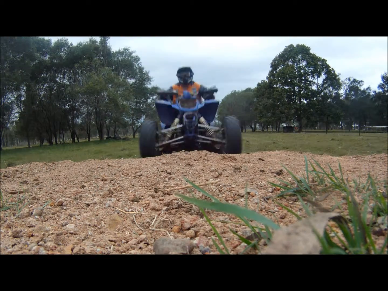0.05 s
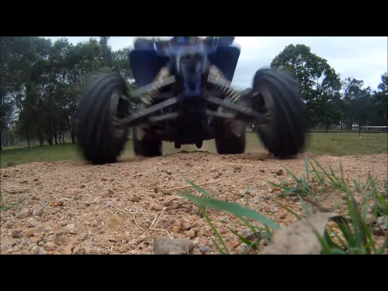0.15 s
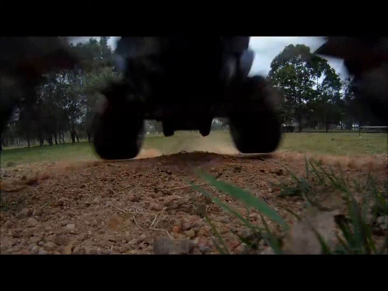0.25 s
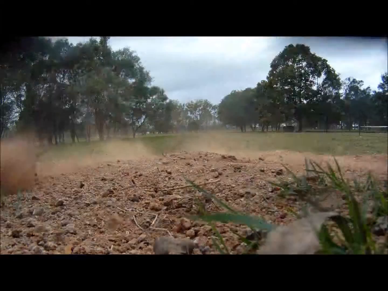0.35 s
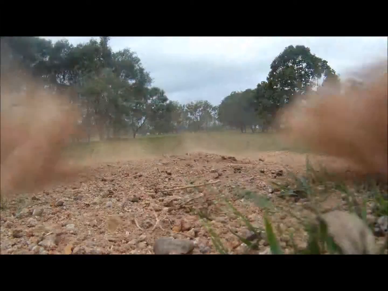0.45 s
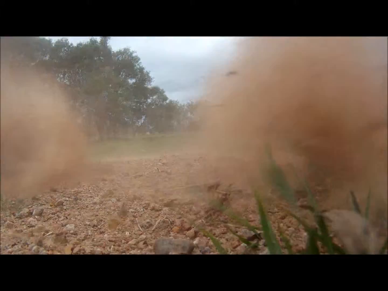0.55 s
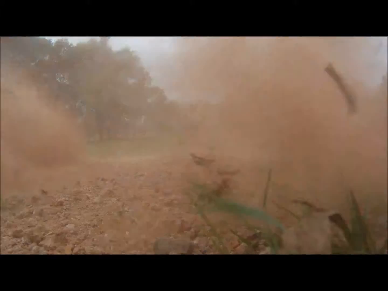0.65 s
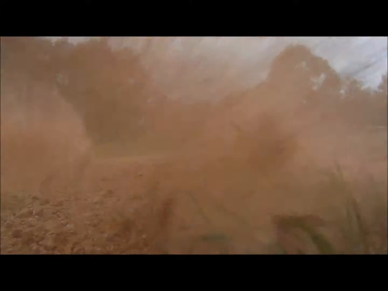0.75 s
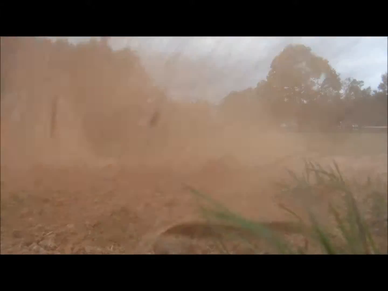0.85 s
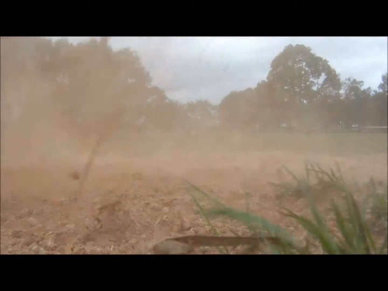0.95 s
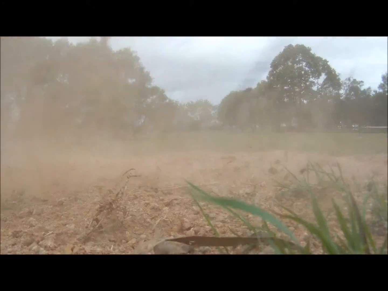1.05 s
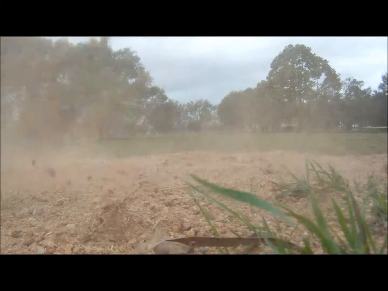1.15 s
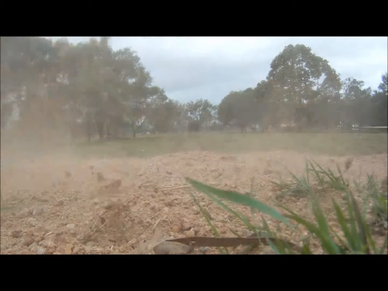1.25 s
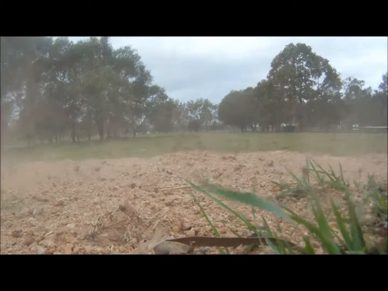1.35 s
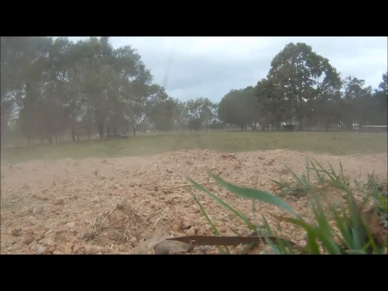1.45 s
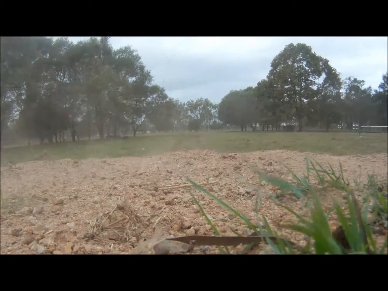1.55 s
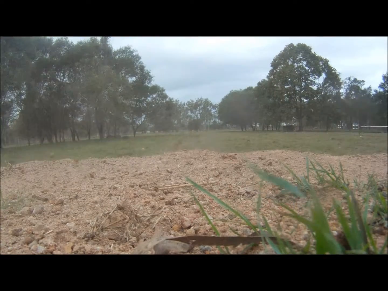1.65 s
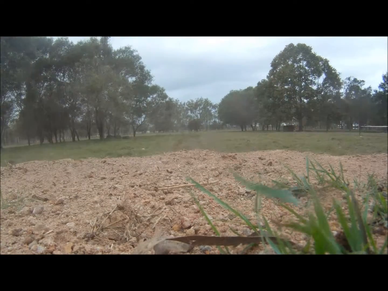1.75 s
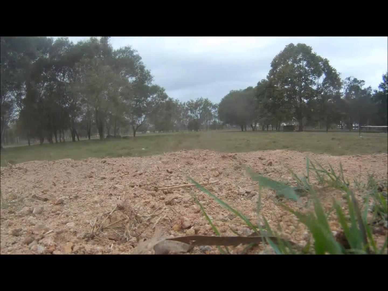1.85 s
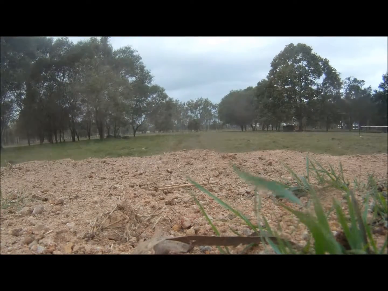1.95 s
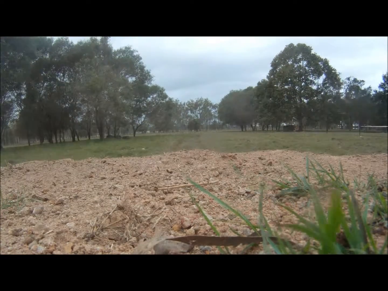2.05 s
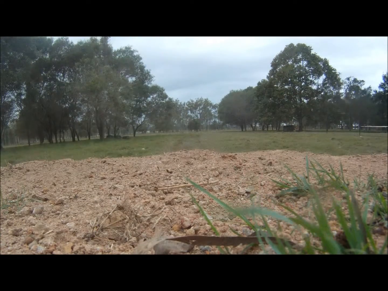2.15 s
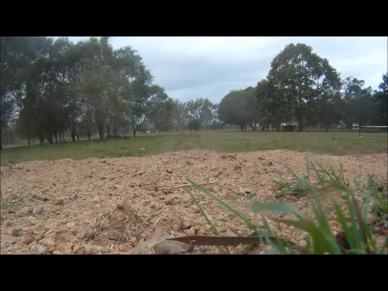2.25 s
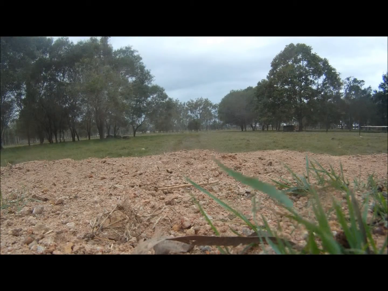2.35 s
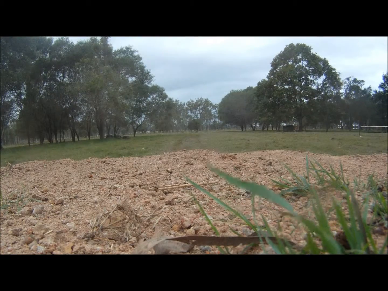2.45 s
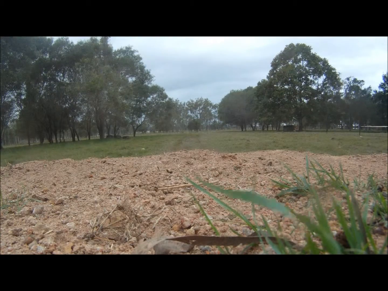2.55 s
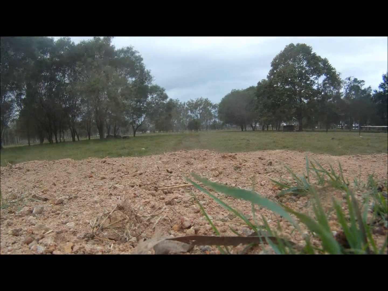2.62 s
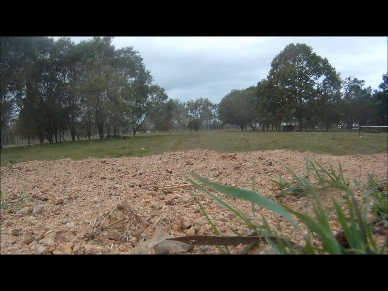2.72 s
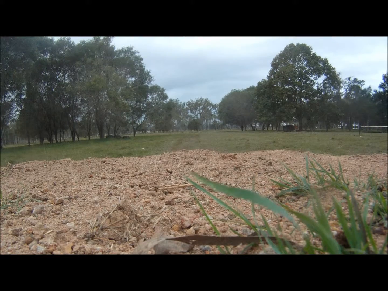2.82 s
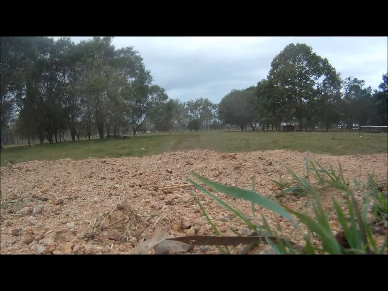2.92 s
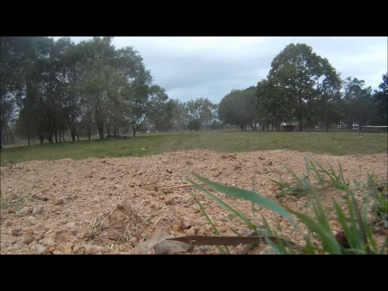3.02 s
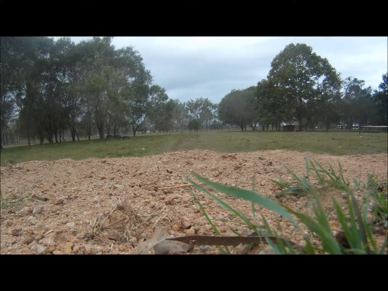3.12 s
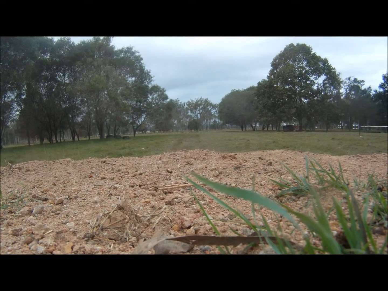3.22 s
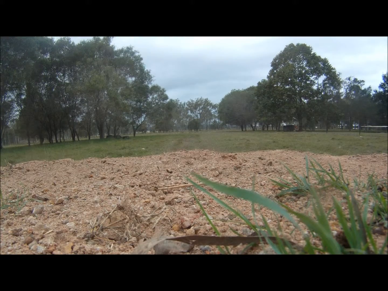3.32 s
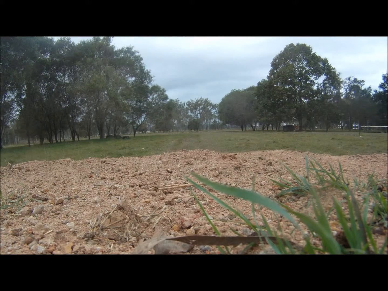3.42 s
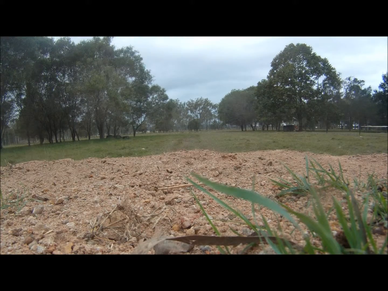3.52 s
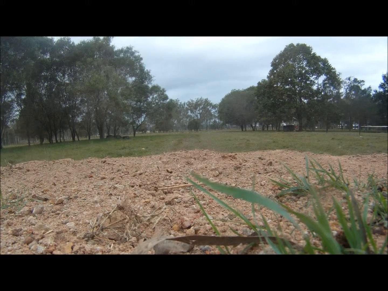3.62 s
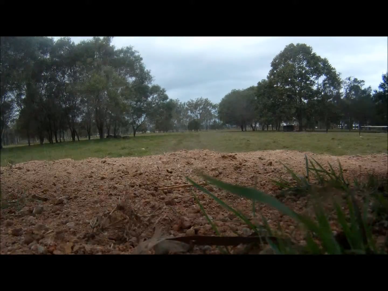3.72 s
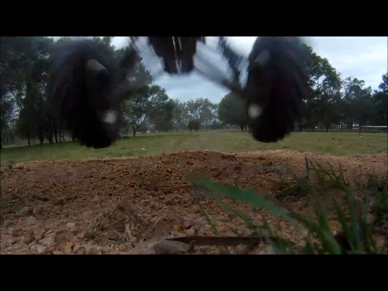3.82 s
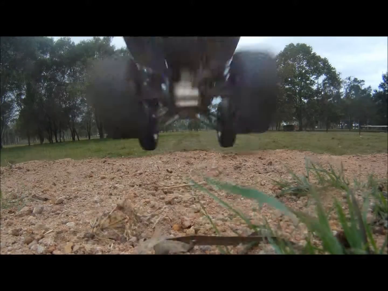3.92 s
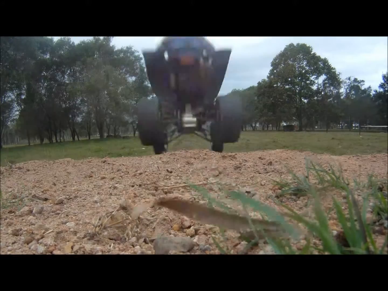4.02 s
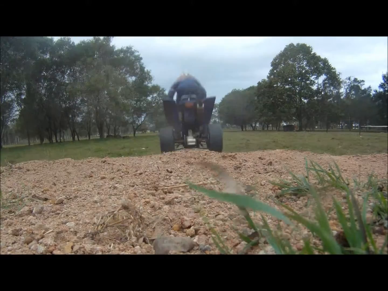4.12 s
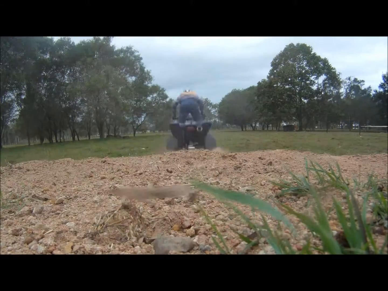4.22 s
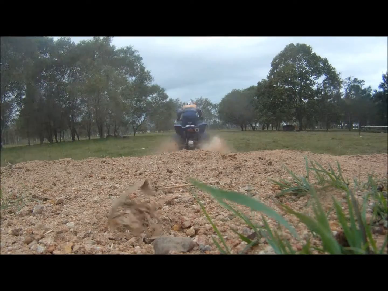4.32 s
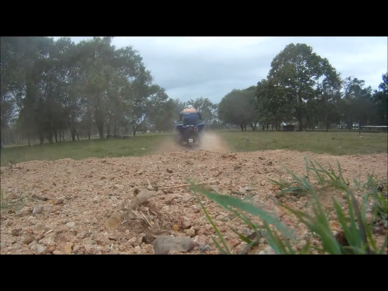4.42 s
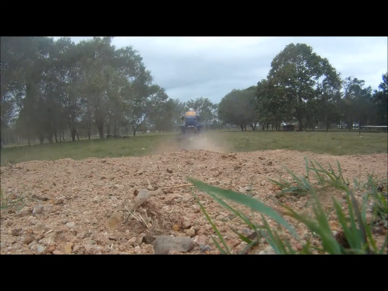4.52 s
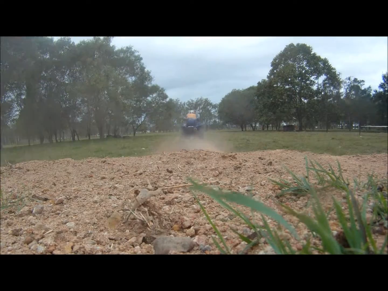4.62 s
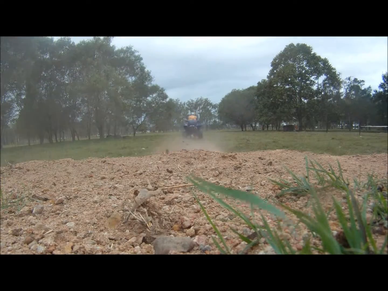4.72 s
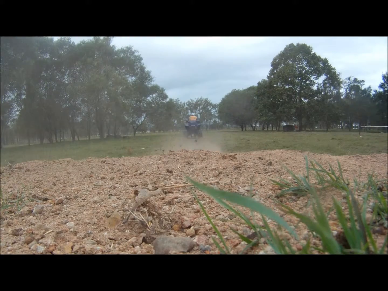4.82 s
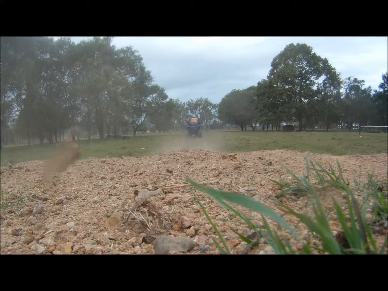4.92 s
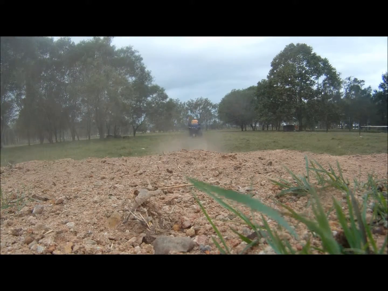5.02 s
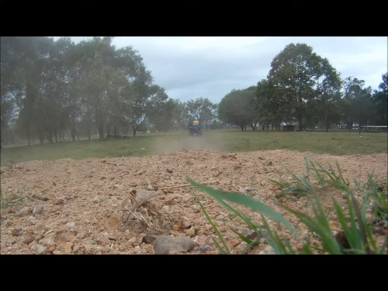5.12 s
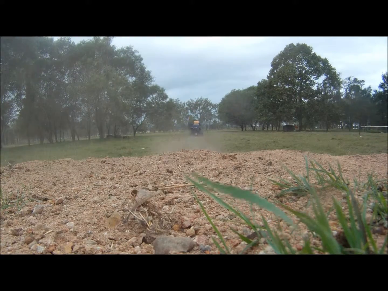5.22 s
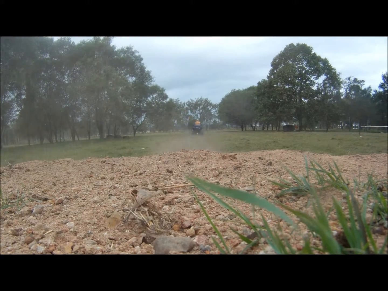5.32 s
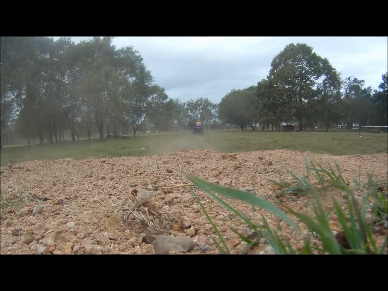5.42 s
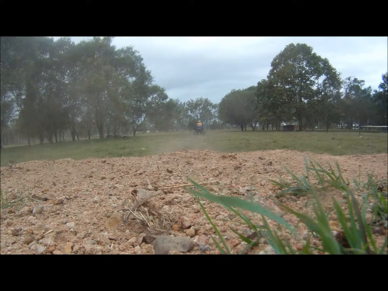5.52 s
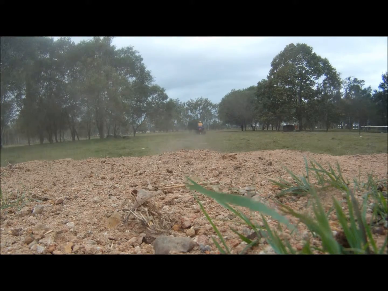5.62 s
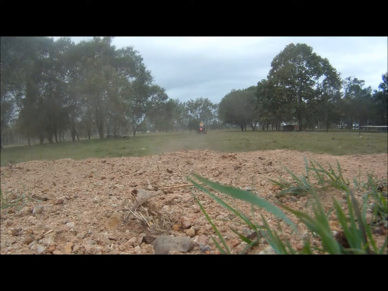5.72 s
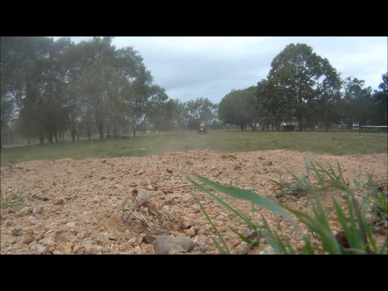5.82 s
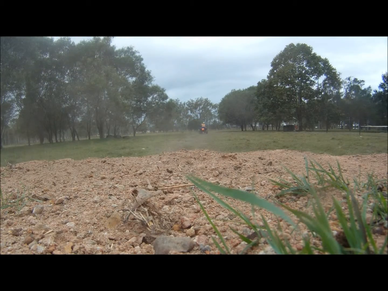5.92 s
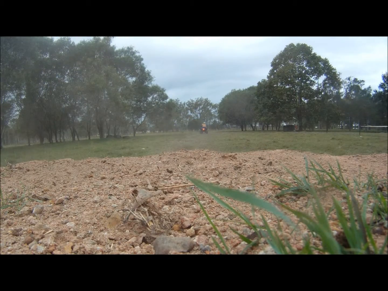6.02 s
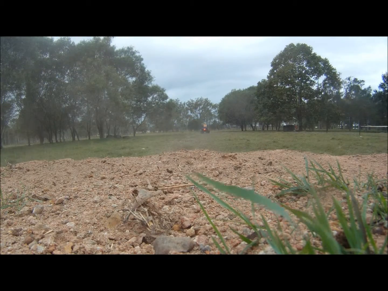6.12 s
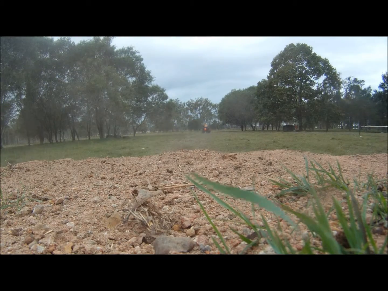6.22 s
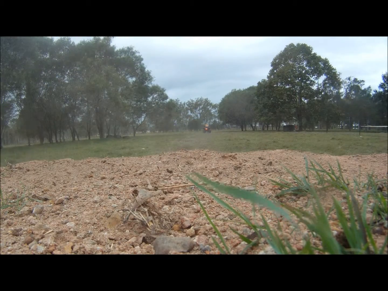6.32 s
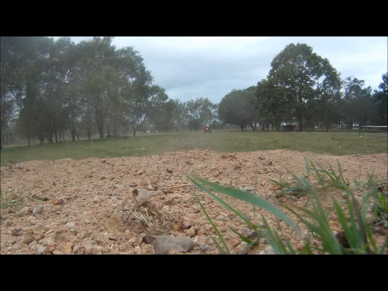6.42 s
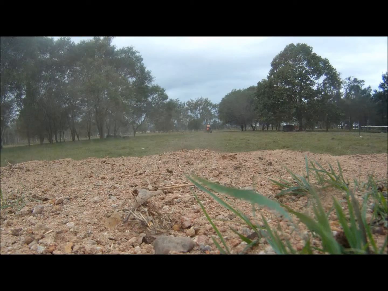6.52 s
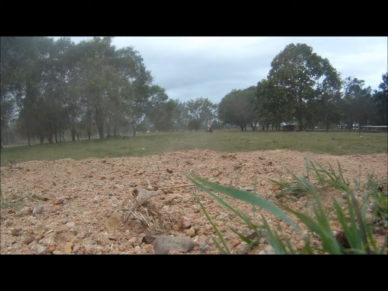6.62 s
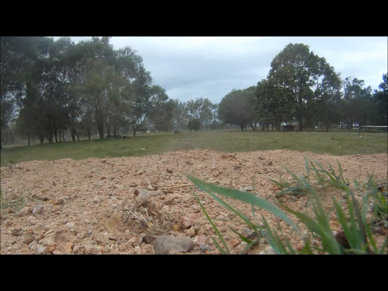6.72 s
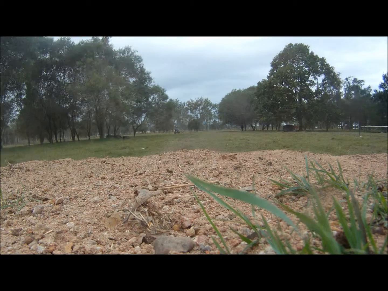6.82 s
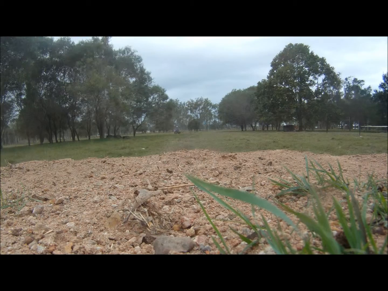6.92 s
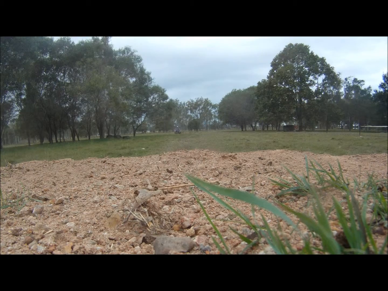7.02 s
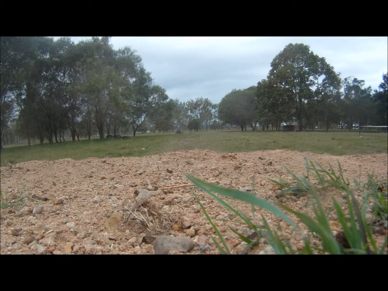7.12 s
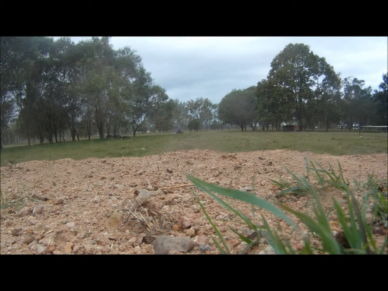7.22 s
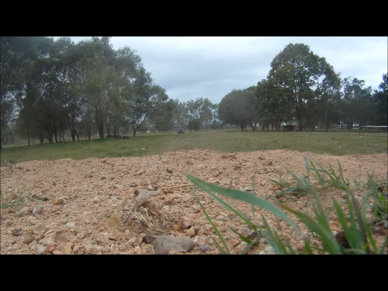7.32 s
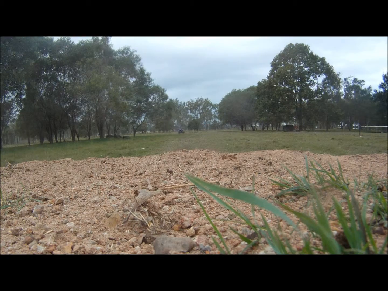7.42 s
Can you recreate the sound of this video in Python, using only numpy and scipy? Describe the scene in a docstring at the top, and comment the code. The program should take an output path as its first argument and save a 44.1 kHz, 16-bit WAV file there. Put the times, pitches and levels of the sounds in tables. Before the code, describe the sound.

A single-cylinder quad bike blares close over a microphone in a hard case on the ground. Dirt sprays and stones crack against the case, loud enough to distort and briefly duck the engine. The bike rolls off behind, returns revving, jumps overhead again with grit and clanking suspension, then putters away across an open, faintly breezy field.

```python
"""A single-cylinder quad bike jumps a dirt mound right over a camera on the ground, throwing up dirt.
As it comes down, stones crack on the case as modal rings with noise; loud peaks clip and the gain ducks.
The bike rolls on, comes back from behind, jumps the mound again and clanks over bumps on its way out.
A late pebble rattles on the case; the bike putters away over a faintly breezy field, missing a few firings.
The engine is firing orders shaped by the pipe, plus ringing and noise bursts once per firing."""
import sys
import numpy as np
from scipy import signal
from scipy.fft import rfft, irfft, next_fast_len
from scipy.io import wavfile
from scipy.ndimage import uniform_filter1d, minimum_filter1d, map_coordinates

SR = 44100
rng = np.random.default_rng(int(sys.argv[2]) if len(sys.argv) > 2 else 0)


def to_wav(s):
    """Save 16-bit WAV."""
    ch = np.atleast_2d(s).T  # columns
    pcm = np.round(np.clip(ch, -1, 1) * 32767)  # PCM
    wavfile.write(sys.argv[1], SR, pcm.astype(np.int16))


N = 328986
T = np.arange(N) / SR  # s


def amp(db):
    """Amplitude factor of a level in dB."""
    return 10 ** (np.asarray(db) / 20)


def unit(x):
    """x scaled to rms 1."""
    return x / np.sqrt(np.mean(x ** 2) + 1e-20)


def along(points, hz):
    """Interpolate (hz, value) points on a log frequency axis."""
    point_hz, values = np.transpose(points)
    return np.interp(np.log(hz + 1), np.log(point_hz + 1), values)


def curves(rows):
    """One value per sample for each column after the time."""
    time_s, *columns = np.transpose(rows)
    return [np.interp(T, time_s, column) for column in columns]


def wobble(rate_hz):
    """Smooth random curve with rate_hz knots a second."""
    knots = rng.standard_normal(int(N * rate_hz / SR) + 4)
    coarse_s = T[::16]
    return np.interp(T, coarse_s, map_coordinates(knots, [coarse_s * rate_hz]))


def filtered(x, response):
    """x times a response of frequency."""
    m = next_fast_len(N + 8192)
    return irfft(rfft(x, m) * response(np.fft.rfftfreq(m, 1 / SR)), m)[..., :N]


def causal(points, size=8192):
    """Frequencies and minimum-phase response of a spectrum, by folding its cepstrum."""
    hz = np.fft.rfftfreq(size, 1 / SR)
    cepstrum = irfft(np.log(amp(along(points, hz))))
    folded = 2 * cepstrum * (np.arange(size) < size // 2)
    return hz, np.exp(rfft(folded) - cepstrum[0])


def in_case(x, spectrum):
    """x with the given colour and the resonances of the camera case, rms 1."""
    # resonances and hollows of the case: centre_hz, width_hz, gain_db
    case_modes = [(1000, 110, 1.5), (1420, 100, 4), (2140, 220, 2.5), (3200, 73, 4.5), (5950, 650, -11.5),
                  (8800, 200, 9), (9810, 450, 9), (11840, 4500, -5), (14200, 390, 11.5), (15100, 280, 7.5)]

    def response(f):
        peaks_db = sum(db / (1 + (2 * (f - hz) / width_hz) ** 2) for hz, width_hz, db in case_modes)
        return amp(along(spectrum, f) + peaks_db)

    return unit(filtered(x, response))


def air():
    """A faint breeze over grass and trees: slowly wavering coloured noise."""
    # open-air noise colour: hz, relative_db_per_hz
    field_colour = [(25, 0.5), (120, 3), (300, -1), (600, -10.5), (1600, -13.5), (2200, -12.5),
                    (4000, -16.5), (6000, -21), (7500, -22), (9800, -25), (12000, -31), (15000, -26)]
    level_db = -61.5 + .7 * wobble(2)
    return amp(level_db) * in_case(rng.standard_normal(N), field_colour)


def grit(density_hz, spread_db, clump_db):
    """Dirt patters down as random grains in clumps; each spray swells fast and dies away."""
    # grain colour: hz, relative_db_per_hz
    grain_colour = [(350, -47.5), (600, -16.5), (788, -12), (1390, -8), (2400, -3), (3070, -6),
                    (6060, -17.5), (9630, -13.5), (12000, -40.5), (14300, -14.5), (15500, -32)]
    # dirt sprays at the jumps and late trickles of grit: peak_s, peak_level_db, t60_s
    sprays = [(0.209, -20, .45), (.54, -30, 0.44), (.645, -14.5, .25), (.745, -20, 0.47), (.88, -34, 1.2),
              (1.17, -40.5, 1.4), (3.689, -17.5, .3), (4.27, -49.5, 1.2)]
    rise_db_per_s = 219
    sizes = amp(spread_db * rng.standard_normal(N) + clump_db * wobble(70))
    grains = (rng.random(N) < density_hz / SR) * rng.standard_normal(N) * sizes
    impulse = irfft(causal(grain_colour)[1])
    flow = 0
    for s, db, t60_s in sprays:
        drop_db = np.maximum(rise_db_per_s * (s - T), 60 * (T - s) / t60_s)
        flow = flow + amp(db - drop_db)
    return flow * unit(signal.fftconvolve(grains, impulse)[:N])


def chassis():
    """Chain and suspension clank over bumps: short decaying bursts of coloured noise."""
    # clanks: start_s, relative_level_db, t60_s
    knocks = [(4.2745, -23, 0.035), (4.2987, -21.5, 0.02), (4.3406, -33, 0.037), (4.466, -16, 0.017),
              (4.744, -27, 0.038), (4.94, -17.5, 0.13), (4.9782, -10, 0.014)]
    colour = [(300, -12), (900, -2.5), (2500, -3.0), (4500, -13.5), (9000, -18), (15000, -22)]
    blows = sum(amp(db - 60 * np.maximum(T - s, 0) / t60_s) * (T >= s) for s, db, t60_s in knocks)
    return amp(-12.5) * blows * in_case(rng.standard_normal(N), colour)


def strike(t, t60_s, pitch, crack):
    """Struck case: its modes at new strengths and pitches plus a crack of noise, peak 1."""
    # modes of the struck case: nominal_hz, nominal_db
    shell_modes = [(780, -14), (1050, -7.5), (1420, -12), (1880, 1), (2200, 0), (2460, 2.5), (2700, 2.5),
                   (3150, -9), (3650, -1.5), (4590, -8), (8250, -14.5), (9300, -4.5), (9850, -21.5),
                   (14400, -21)]
    hz, db = np.transpose(shell_modes)[:, :, None]
    strength, detune, phase = rng.standard_normal((3, len(hz), 1))
    mode_hz = hz * pitch * (1 + .03 * detune)
    ring = np.sum(amp(db + 2 * strength) * np.sin(2 * np.pi * (mode_hz * t + phase)), axis=0)
    colour = amp(along(shell_modes, np.fft.rfftfreq(len(t), 1 / SR)))
    snap = unit(irfft(rfft(rng.standard_normal(len(t))) * colour, len(t)))
    envelope = amp(-60 * t / t60_s) * (1 - np.exp(-t / 0.00017))
    blow = (unit(ring) + crack * snap) * envelope
    return blow / np.max(abs(blow))


def stones(thud_time_s):
    """Stones crack on the case; heavy blows come with a short low-mid ring and one slow swing of pressure."""
    # blows on the case: start_s, crack_peak_db, thud_gain_db, pitch_factor
    blows = [(0.506, -2, -48, 1), (.52, -1, -40, 1.19), (.558, -8, -42, 0.98), (.581, -3, -43, 1.36),
             (.602, -3, -42, 1), (.608, -6, -33, 1.04), (0.629, -6, -36, 1), (.642, 4, -44.5, 1.05),
             (.646, 3, -26.5, 0.95), (.66, 6.5, -34, 1.05), (0.673, -2, -41.5, 0.92),
             (0.72, -4, -38.5, 0.89), (.733, -9, -38, 1.05), (.754, 7.5, -5, 1), (0.778, -.5, -43, .9),
             (.804, -5.5, -44, 1), (.822, 11.5, -15.5, .85), (.868, -10.5, -51, 0.83),
             (.876, -7, -43, 1.08), (.906, -12.5, -55, 0.92), (0.9525, -3.5, -46, 1.03),
             (.96, -3.5, -38.5, 0.96), (.971, -19, -43, 1), (1.0112, 9, -18, 0.88), (1.039, 9, -21.5, 1),
             (1.046, 11.5, -29, 0.96), (1.13, -20.5, -51, 1.14), (1.154, -17.5, -57, 0.82),
             (1.2074, 19, 7.5, 0.82), (1.362, -17.5, -50, 1.17), (5.346, 4.5, -28.5, 0.9),
             (5.3557, 5, -23, 0.88), (5.364, 11.5, -30, 0.98)]
    # short low-mid ring that comes with a heavy blow: mode_hz, relative_db, t60_s
    knock_modes = [(271.7, -6.5, 0.011), (349.6, -5.5, 0.033), (578, -5, 0.042)]
    out, t = np.zeros(N + SR), np.arange(SR // 10) / SR
    u = t / thud_time_s
    swing = -4 * u * (1 - u / 2) * np.exp(-u)
    knock = sum(amp(db - 60 * t / t60_s) * np.sin(2 * np.pi * hz * t) for hz, db, t60_s in knock_modes)
    thud = swing + amp(-0.5) * knock
    for s, db, thud_db, pitch in blows:
        crack = amp(db) * strike(t, t60_s=0.015, pitch=pitch, crack=.85)
        out[round(s * SR):][:len(t)] += crack + amp(thud_db) * thud
    return out[:N]


def heard():
    """Distance to the bike in metres, and how far it is in front of the camera (0-1)."""
    # path of the bike, negative behind the camera: time_s, in_front_m
    track = [(0, 4), (.27, 0), (.6, -1.55), (.8, -3), (2.1, -4.5), (2.65, -10), (3.05, -8.5), (3.35, -4.5),
             (3.72, 0), (3.85, 1.17), (4.08, 2), (4.22, 3), (4.9, 4.5), (6, 10.5), (6.7, 16), (7.46, 20.5)]
    pass_height_m, side_blend_m = 1, .6
    x_m, = curves(track)
    return np.hypot(x_m, pass_height_m), (1 + np.tanh(x_m / side_blend_m)) / 2


def rasp_swell():
    """Extra gain of the rasp during its louder spells around the two passes."""
    # spells of brighter, louder rasp: start_s, end_s
    spells = [(.16, 0.41), (3.62, 4.13)]
    gain_db, fade_s = 7, .04

    def edge(s):
        return np.tanh((T - s) / fade_s) / 2

    return amp(gain_db * sum(edge(start_s) - edge(end_s) for start_s, end_s in spells))


def pipe_towards_camera(distance_m, turn_time_s):
    """1 while the bike drives away, its pipe pointing at the camera, else 0; smoothed over turn_time_s."""
    return uniform_filter1d(1. * (np.gradient(distance_m) > 0), size=round(turn_time_s * SR))


def loudness(rate_hz, throttle, distance_m, front):
    """Gain of each engine voice from distance, gas, engine speed and side of the camera."""
    # each voice: level_db (1 m behind, full throttle, cruise rate), loss_db_per_distance_doubling,
    # gain_db_per_gas_doubling, gain_db_per_speed_doubling, gain_db_in_front
    voices = dict(
        thump=(-27, 8.5, 0.48, -5.5, 4),
        hum=(-24, 9, 3.5, 6, 4.5),
        bark=(-24.5, 9.5, 5, 6.5, 4),
        rumble=(-41.5, 8.5, 1.5, 0, 6.5),
        chuff=(-27, 9, 4.5, 4.5, -1.5),
        crack=(-30, 7, 6, -0.5, -13),
        rasp=(-21, 11.5, 0.93, 4, 0.47))
    idle_feed, cruise_rate_hz = 0.027, 48.2  # idle_feed: gas past a shut throttle
    gas_share = (throttle + idle_feed) / (1 + idle_feed)
    far, gas, revs = np.log2([distance_m, gas_share, rate_hz / cruise_rate_hz])
    return {name: amp(db - far_db * far + gas_db * gas + revs_db * revs + front_db * front)
            for name, (db, far_db, gas_db, revs_db, front_db) in voices.items()}


def crank(jitter):
    """Firing rate, cycles run so far, and a gate that drops on missed firings."""
    # engine speed: time_s, firings_hz
    firing_rate = [(0, 39.9), (.12, 39.9), (.28, 56.4), (.36, 56.1), (.45, 60.6), (.53, 56.7), (.62, 61.4),
                   (.9, 49), (1.1, 45.5), (1.6, 45.4), (1.73, 49.6), (1.92, 48), (2.03, 53.8), (2.25, 43),
                   (2.4, 39), (3.15, 38.6), (3.3, 41.2), (3.52, 47.7), (3.7, 59.4), (3.8, 66.1), (4, 67.8),
                   (4.13, 74.1), (4.2, 64.6), (4.3, 56), (4.45, 50.2), (4.78, 45), (4.92, 53.5),
                   (5.05, 37.8), (5.25, 39.2), (5.9, 36), (6.7, 30.7), (6.78, 39), (7.1, 46.4),
                   (7.46, 50.6)]
    # cycles that fail to fire: time_s
    misfires = [5.903, 6.625, 6.757]
    rate_hz, = curves(firing_rate)
    cycles = np.cumsum(rate_hz * (1 + jitter * wobble(45))) / SR
    fired = np.ones(N)
    for s in misfires:
        missed = np.round(np.interp(s, T, cycles))
        fired[np.floor(cycles + .15) == missed] = 0.19
    return rate_hz, cycles, uniform_filter1d(fired, size=100)


def strengths(cycles, scatter_db):
    """Every combustion has its own strength."""
    sizes = amp(scatter_db * rng.standard_normal(1024))
    return uniform_filter1d(sizes[cycles.astype(int)], size=60)


def exhaust(rate_hz, cycles, throttle, front, split_hz, echo, round_trip_s, smear, count=22):
    """Firing orders shaped by the pipe: deep thump, hum of the crank order and bark, rms about 1."""
    # pulse spectra under load and with the throttle shut: hz, relative_db
    loaded_pulse = [(25, -21.5), (45, -4.5), (58, 1.5), (90, -1.5), (113, -8.5), (148, 3), (200, 1),
                    (290, 3.5), (380, -2), (470, -4), (580, -16.5), (680, -11), (850, -5), (1080, -10.5),
                    (1500, -17)]
    coasting_pulse = [(25, -29), (40, -20.5), (80, -5.5), (115, 4), (155, -7), (195, -3.5), (235, -12),
                      (275, -5), (330, -23.5), (500, -28), (1500, -42)]
    step = 8  # computed at SR / step
    rate_hz, cycles, throttle, front = [x[::step] for x in (rate_hz, cycles, throttle, front)]
    order = np.arange(1, count + 1)[:, None]
    hz = order * rate_hz
    (grid_hz, loaded), (_, coasting) = causal(loaded_pulse), causal(coasting_pulse)
    pipe = throttle * np.interp(hz, grid_hz, loaded) + (1 - throttle) * np.interp(hz, grid_hz, coasting)
    # the pulse runs down the pipe once more
    pipe = pipe * (1 + echo * np.exp(-2j * np.pi * hz * round_trip_s))
    # heard around the case from behind: highs come later and weaker than from in front
    pipe = pipe * np.exp(-1j * smear * (1.3 - front) * (hz / 400) ** 2)
    pipe = pipe * amp(-8 * (2 - front) * (hz / 800) ** 2)
    size = abs(pipe)
    wave = -(pipe * np.exp(2j * np.pi * order * cycles)).real
    high = np.clip((hz - split_hz) / 100 + .5, 0, 1)
    # order 2 swings once per turn of the crankshaft
    shares = [np.sqrt(1 - high) * (order != 2), order == 2, high]
    parts = []
    for share in shares:
        rms = np.sqrt(np.sum((share * size) ** 2, axis=0) / 2 + 1e-12)
        parts.append(np.sum(share * wave, axis=0) / rms)
    return signal.resample_poly(parts, step, 1, axis=1, window=("kaiser", 10))[:, :N]


def puffs(rate_hz, cycles, delay_cycles, rise_s, decay_s, between):
    """Noise that bursts out once a cycle as the valve opens, over a steady share between bursts."""
    age_s = ((cycles - delay_cycles) % 1) / rate_hz
    gate = (1 - np.exp(-age_s / rise_s)) * np.exp(-age_s / decay_s)
    return (unit(gate) + between) / (1 + between) * rng.standard_normal(N)


def bursts(rate_hz, cycles, between, share, ring_time_s):
    """One burst per firing: the silencer rings alike each time, turbulence differs; share is the ring."""
    slaps = np.diff(np.floor(cycles - .06), prepend=-1)
    t = np.arange(SR // 50) / SR
    shell = rng.standard_normal(len(t)) * (1 - np.exp(-t / 0.00057)) * np.exp(-t / ring_time_s)
    ring = unit(signal.fftconvolve(slaps, shell)[:N])
    gas = unit(puffs(rate_hz, cycles, delay_cycles=0.067, rise_s=0.0028, decay_s=0.006, between=between))
    return np.sqrt(share) * ring + np.sqrt(1 - share) * gas


def quad():
    """Exhaust pulses with cracks and turbulent gas; the rasp changes colour as the bike crosses over."""
    # throttle opening: time_s, opening_0_to_1
    throttle_rows = [(0, 0.73), (.61, 0.51), (.68, 0), (.9, 0), (1.12, 0.49), (2.11, 0.41), (2.17, 0),
                     (2.62, 0.16), (2.7, .86), (3.74, 0.6), (3.86, .22), (4.15, 0.68), (4.94, .45),
                     (5.02, 0.09), (6.72, 0), (6.78, 0.3), (7.46, 0.59)]
    # silencer's effect on the hum: hum_hz, gain_db
    hum_resonance = [(60, -0.5), (80, 1.5), (93, -4.5), (105, -0.5), (118, 2.5), (135, 3), (148, -1.5)]
    # gas and metal noise from behind the camera and from in front: hz, relative_db_per_hz
    behind_colour = [(500, -22), (800, -21), (1050, -5), (1400, -1.5), (1700, -11), (2200, -0.5),
                     (2700, -2), (3900, -28), (5000, -17), (6000, -28), (7500, -27), (9600, -16),
                     (12000, -22.5), (14500, -22.5)]
    front_colour = [(500, -18), (900, -7), (1200, -11.5), (1450, -12.5), (1800, -12.5), (2130, 1),
                    (2650, -13.5), (3270, -3.5), (4100, -22.5), (6000, -18.5), (8000, -26.5), (9600, -15.5),
                    (12000, -30), (14500, -22.5)]
    rumble_colour = [(20, 0), (60, 0), (300, -5), (500, -13), (1200, -50)]
    chuff_colour = [(200, -14), (420, -1.5), (650, 0), (900, -14), (1500, -21.5), (4000, -67.5)]
    crack_colour = [(400, -45.5), (850, -21), (1180, -1), (1400, -0.5), (1750, -15), (4000, -46)]

    rate_hz, cycles, fired = crank(jitter=.002)
    throttle = np.clip(curves(throttle_rows)[0], 0, 1)
    distance_m, front = heard()
    gain = loudness(rate_hz, throttle, distance_m, front)

    thump, hum, bark = exhaust(rate_hz, cycles, throttle, front,
                               split_hz=320, echo=0.21, round_trip_s=.0078, smear=2.7)
    hum = hum * amp(along(hum_resonance, 2 * rate_hz))
    gas = puffs(rate_hz, cycles, delay_cycles=.045, rise_s=.001, decay_s=0.0069, between=1.5)
    rumble, chuff = in_case(gas, rumble_colour), in_case(gas, chuff_colour)
    clicks = np.diff(np.floor(cycles - .05), prepend=-1)  # one per firing
    crack = in_case(clicks, crack_colour) * pipe_towards_camera(distance_m, turn_time_s=0.12)
    voices = dict(thump=thump, hum=hum, bark=bark, rumble=rumble, chuff=chuff, crack=crack)
    pipe = sum(gain[name] * voice for name, voice in voices.items())

    between = 0.63 + distance_m / 3.7  # from far off, scatter from the trees fills the gaps
    behind = in_case(bursts(rate_hz, cycles, between, share=.3, ring_time_s=.005), behind_colour)
    ahead = in_case(bursts(rate_hz, cycles, between, share=.45, ring_time_s=.0065), front_colour)
    rasp = gain["rasp"] * rasp_swell() * (np.sqrt(1 - front) * behind + np.sqrt(front) * ahead)
    return fired * strengths(cycles, scatter_db=.5) * pipe + strengths(cycles, scatter_db=1) * rasp


def scene():
    """Both channels hear the same sound through the closed case."""
    sound = air() + grit(density_hz=3700, spread_db=2, clump_db=4.5) + chassis()
    sound = sound + stones(thud_time_s=.0035) + quad()
    return np.array([sound, sound])


def ducked(x, threshold_db, release_db_per_s, lag_s):
    """Gain control: drops just after an overload, holds briefly and climbs back at a steady dB rate."""
    pole = np.exp(-1 / (lag_s * SR))
    level_db = 10 * np.log10(signal.lfilter([1 - pole], [1, -pole], x[0] ** 2) + 1e-12)
    excess_db = np.maximum(level_db - threshold_db, 0)
    excess_db = -minimum_filter1d(-excess_db, size=1100, origin=549)  # hold, in samples
    release_db = release_db_per_s * T
    cut_db = np.maximum.accumulate(excess_db + release_db) - release_db
    return x * amp(-np.interp(T - lag_s, T, cut_db))


def record(dry):
    """Gain control, clipping at full scale and the band limit."""
    top_hz = 15600
    loud = np.clip(ducked(dry, threshold_db=-10.5, release_db_per_s=149.0, lag_s=0.0072), -1, 1)
    return filtered(loud, lambda hz: 1 / (1 + (hz / top_hz) ** 120))


dry = scene()
out = record(dry)
to_wav(out)
```